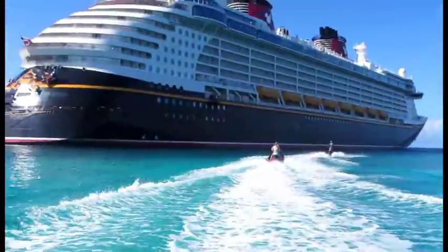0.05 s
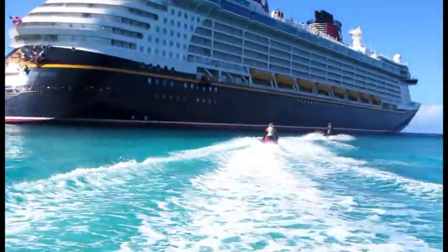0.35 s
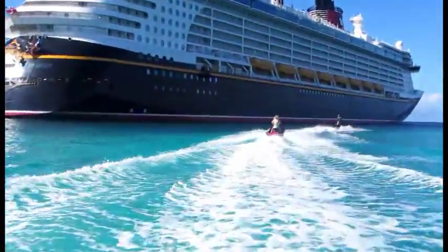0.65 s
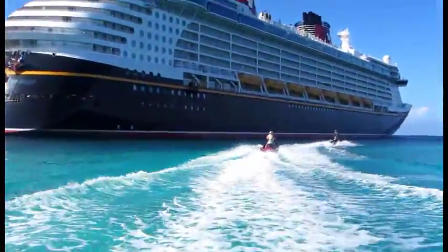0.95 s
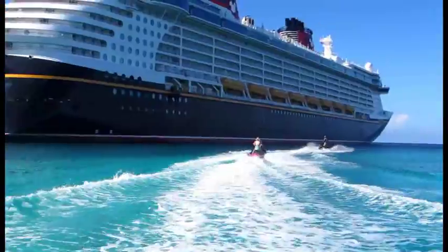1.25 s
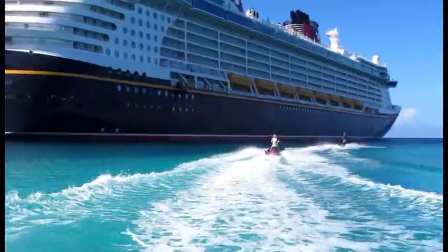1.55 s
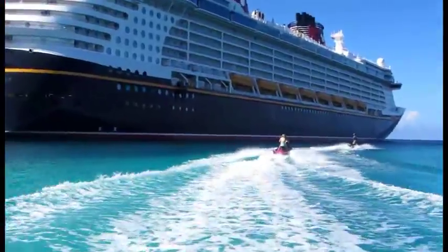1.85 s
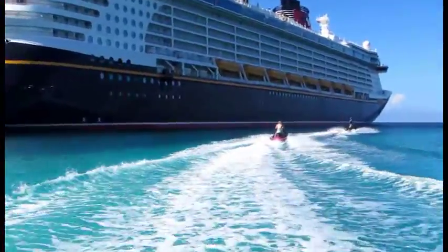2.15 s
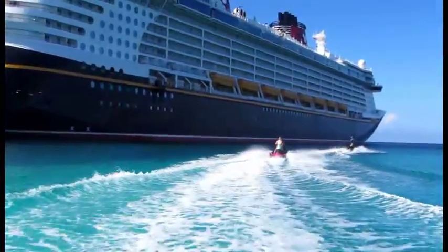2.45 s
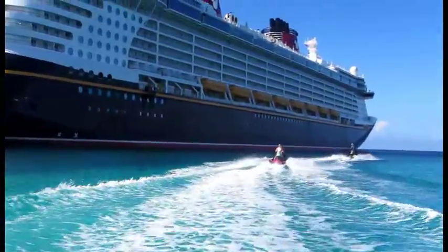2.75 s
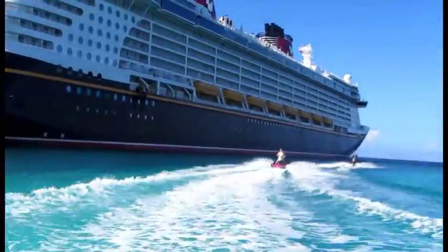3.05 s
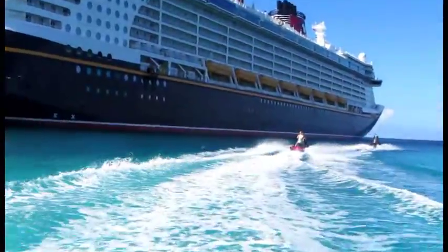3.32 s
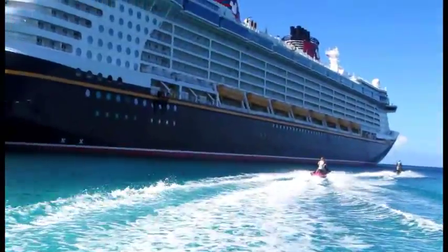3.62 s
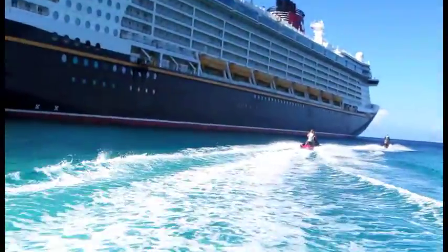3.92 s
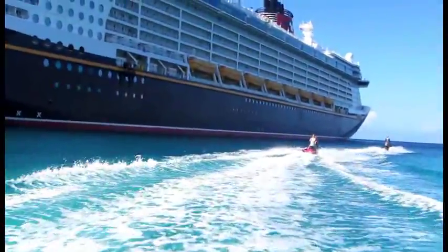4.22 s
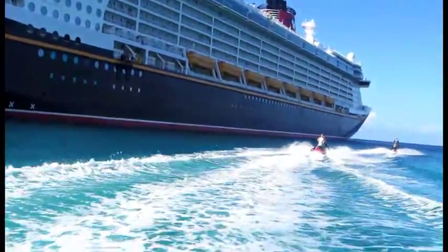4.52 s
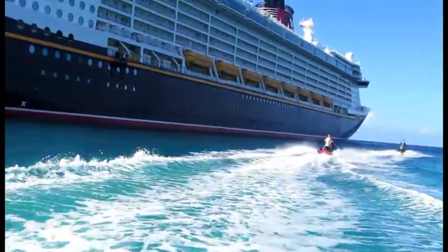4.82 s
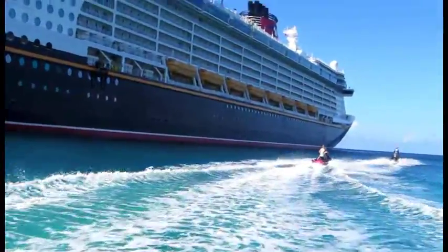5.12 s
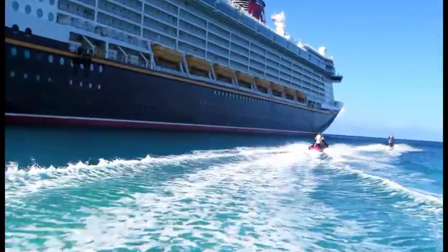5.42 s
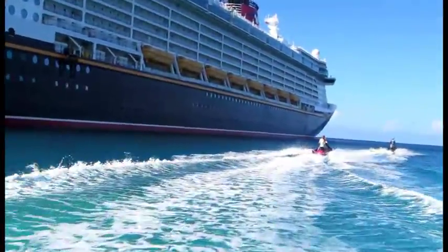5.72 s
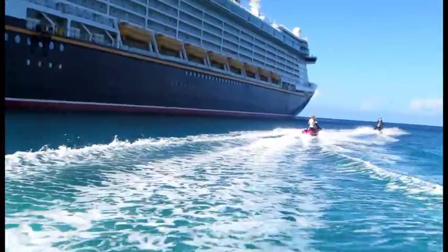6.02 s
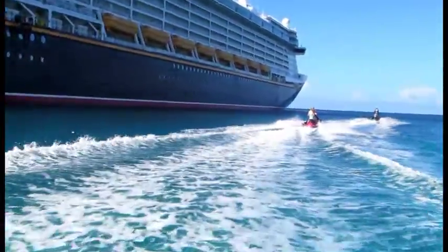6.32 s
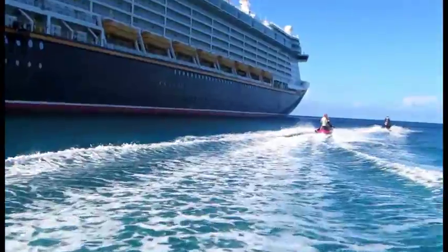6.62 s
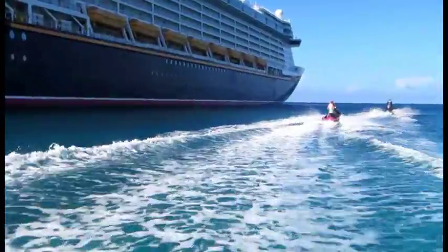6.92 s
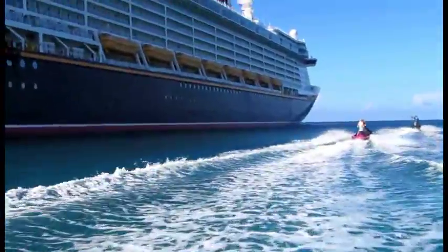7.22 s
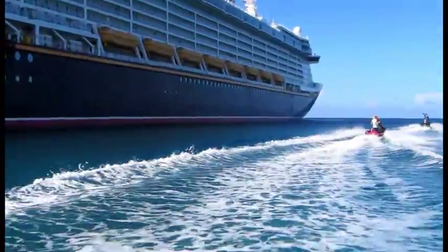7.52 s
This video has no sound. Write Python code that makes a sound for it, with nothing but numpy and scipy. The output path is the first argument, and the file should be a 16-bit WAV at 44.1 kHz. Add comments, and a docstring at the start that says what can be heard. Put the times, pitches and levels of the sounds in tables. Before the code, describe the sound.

Close, throbbing jet ski engine runs over rushing water, with repeated splashes of spray, wind rumble and one hull thump.

```python
"""A jet ski's exhaust drones over open sea, heard from the rider's seat.
Its periodic pulses form a harmonic series, and the gas burbles through the water and drums the hull.
Spray hisses up whenever the bow digs into a wave, and the exhaust throbs as the stern follows.
Turbulent wind buffets the microphone, and once the hull lands hard with a damped double thump."""
import sys
import numpy as np
from scipy import signal
from scipy.fft import rfft, irfft
from scipy.io import wavfile

SR = 44100
rng = np.random.default_rng(int(sys.argv[2]) if len(sys.argv) > 2 else 0)


def unload_audio(sound):
    """Save the sound as a 16-bit wav file, at the path given as the first command line argument."""
    columns = np.transpose(np.atleast_2d(sound))
    # keep every value between -1 and 1, then stretch to whole-number steps
    steps = np.round(np.clip(columns, -1, 1) * 32767)
    wavfile.write(sys.argv[1], SR, steps.astype(np.int16))


N = 337806
TIME = np.arange(N) / SR

# waves met by the hull: (t/s, half-width/s, bow drive/dB, throb drive/dB, throb delay/s)
SEA_WAVES = [(0.145, 0.21, 7, 6, 0.27), (0.837, .15, 4.5, 1.1, 0), (1.27, 0.24, 6, 4.5, 0.01),
             (1.843, .19, 7, 5.5, 0.068), (2.244, 0.094, 3, 5, 0.043), (2.78, 0.32, 7.5, 5.4, .26),
             (3.597, 0.17, 8, 5.5, .18), (4.304, .12, 6, 4, 0.092), (4.823, 0.24, 7.7, 3.5, 0.023),
             (5.28, 0.15, 4, 1.4, 0), (5.767, 0.2, 8, 5.8, 0.16), (6.504, 0.21, 7.5, 5, 0.22),
             (7.296, 0.23, 8, 4.5, 0.28)]
# cycle rate of the engine, the fundamental of the series: (t/s, f/Hz)
CYCLE_RATE = [(0, 38.95), (.25, 39.02), (.67, 39.37), (.95, 38.85), (1.9, 39), (2.25, 39), (2.65, 39.09),
              (3.15, 39.29), (3.6, 38.77), (3.95, 39.15), (4.3, 39.2), (4.65, 38.89), (5, 39.2),
              (6.1, 39.25), (6.35, 38.64), (6.95, 39.4), (7.35, 39.36), (7.66, 39.17)]
# the three leading harmonics: drone, firing note before the throb, bright overtone: (t/s, level/dB)
DRONE_LEVEL = [(0, -23.5), (.45, -28.5), (1.2, -24.5), (1.6, -27.5), (1.8, -23), (2.78, -26), (3.01, -21),
               (3.85, -27), (3.99, -22), (4.4, -23.5), (5.2, -22), (6.2, -23), (6.7, -28), (6.92, -20.5),
               (7.66, -21.5)]
FIRING_LEVEL = [(0, -21.5), (.53, -20), (.75, -19), (.85, -23), (1.29, -21.5), (3.59, -23.5), (3.83, -21),
                (4.26, -25.5), (4.47, -21.5), (4.78, -27), (5.04, -21), (5.22, -29), (5.34, -23.5),
                (5.71, -30), (5.81, -22.5), (6.16, -18.5), (6.54, -23), (7.66, -22.5)]
OVERTONE_LEVEL = [(0, -27), (2.58, -23.5), (3.34, -28), (3.63, -24), (3.85, -32), (5.5, -27), (5.61, -38),
                  (5.76, -25), (6.5, -28), (6.7, -39), (7.66, -27)]
DRONE_ORDER, FIRING_ORDER, OVERTONE_ORDER = 5, 6, 8
# weaker harmonics: (harmonic number, initial level/dB, final level/dB, share of the throb)
WEAK_HARMONICS = [(2, -29.5, -30, 1.3), (3, -27, -27, 0.64), (4, -36.5, -36.5, 0.038), (7, -31, -34, -3),
                  (9, -34.5, -34.8, 0.53), (10, -31.5, -31, -0.3), (11, -39.5, -35, -0.98),
                  (13, -43.5, -41, 0.11), (14, -48, -46, .2), (15, -48, -56, -0.19), (16, -52, -51.5, 0.33),
                  (18, -55, -60, .2)]
# spectra of the drumming hull and the rasping outlet: (f/Hz, relative level/dB)
BURBLE_SPECTRUM = [(60, -3.5), (110, -7), (170, -3.5), (240, -1), (295, 2.5), (370, -4.5), (460, -12.5),
                   (600, -29)]
RASP_SPECTRUM = [(300, -7), (440, 1), (520, -2.5), (640, -2.5), (720, -9.5), (800, -27), (1000, -47)]
# brief extra surges of spray and wash: (t/s, wash gain/dB, spray and mist gain/dB, half-width/s)
SPRAY_SURGES = [(.26, .3, 1.8, .04), (1.072, 1, -0.5, 0.053), (1.68, 0.5, -0.5, 0.065), (3.66, 1, 1, .04),
                (4.21, 0, 2, .035), (5.038, 2.5, 0, .05), (6.56, 1.5, 0.5, 0.05), (7.47, 1, 2, .04)]
# spectra of bubbles, drops and fine mist: (f/Hz, relative level/dB)
WASH_SPECTRUM = [(300, -31), (650, -7.5), (790, -11.5), (880, -4.5), (1000, 0), (1400, 0), (1700, -3),
                 (2100, -7), (3000, -16), (4500, -23.5), (9000, -50)]
SPRAY_SPECTRUM = [(1500, -11.5), (3200, -11), (4100, -4), (5000, -1.5), (5600, 0), (6800, -4.5),
                  (8000, -12), (11000, -18.5), (15500, -38)]
MIST_SPECTRUM = [(4000, -6), (7000, -1), (8500, -2.5), (10300, -1), (11800, -4), (15500, -5)]
# rumble of the airflow at the microphone: (t/s, level/dB)
RUMBLE_LEVEL = [(0, -34), (.95, -32), (1.8, -37), (2.8, -39), (3.15, -28), (3.8, -37), (4.8, -37.5),
                (5.35, -35), (5.8, -40), (7.66, -38)]
# buffets of wind: (t/s, level/dB, half-width/s)
WIND_BUFFETS = [(2.25, -24, 0.02), (2.418, -21, .022), (3.048, -26, .025), (3.254, -23, .035),
                (5.05, -20, .022), (6.6, -25, 0.016)]
# spectra of the rumble and the buffets: (f/Hz, relative level/dB)
RUMBLE_SPECTRUM = [(8, -22), (20, 1), (36, 1.5), (60, -1), (100, -7), (200, -25), (500, -49)]
BUFFET_SPECTRUM = [(15, -8), (35, 1), (70, -4), (130, -8), (220, -14), (330, -13), (600, -35)]
# impacts of the hull on the water: (t/s, initial envelope level/dB)
HULL_IMPACTS = [(5.033, -11), (5.084, -14)]


def undb(db):
    """Amplitude ratio of a level: 20 dB is a factor of ten."""
    return 10 ** (np.asarray(db) / 20)


def unit(x):
    """Normalisation to rms 1."""
    return x / np.sqrt(np.mean(x ** 2))


def curves(table):
    """Linear interpolation of each column to one value per sample."""
    times, *columns = np.transpose(table)
    return [np.interp(TIME, times, column) for column in columns]


def swell(t, half_width):
    """Gaussian envelope of height 1 at time t; the half-width is its standard deviation."""
    return np.exp(-.5 * ((TIME - t) / half_width) ** 2)


def colour(x, spectrum):
    """Spectral shaping, with a further 12 dB per octave of roll-off beyond both ends; rms 1."""
    hz, db = np.transpose(spectrum)
    f = np.maximum(np.arange(N // 2 + 1) * SR / N, 1)
    skirts = np.minimum(f / hz[0], 1) ** 2 * np.minimum(hz[-1] / f, 1) ** 2
    gain = undb(np.interp(np.log(f), np.log(hz), db))
    return unit(irfft(rfft(x) * skirts * gain, N))


def noise():
    """Gaussian white noise."""
    return rng.standard_normal(N)


def walk(rate):
    """Low-passed noise: a smooth fluctuation that changes about rate times a second; rms 1."""
    f = np.arange(N // 2 + 1) * SR / N
    return unit(irfft(rfft(noise()) / (1 + (2 * f / rate) ** 4), N))


def drops(per_s, spread_db):
    """Shot noise: independent impulses, many small and a few large; rms 1."""
    hits = rng.random(N) < per_s / SR
    return unit(hits * noise() * undb(spread_db * np.minimum(rng.exponential(size=N), 4)))


def wave_drive(stern_width_ratio=0.69):
    """Amplitude modulation by the waves, in dB: the bow throws spray, then the stern brings a throb."""
    bow_db = sum(db * swell(t, width) for t, width, db, _, _ in SEA_WAVES)
    throb_db = sum(db * swell(t + delay, stern_width_ratio * width)
                   for t, width, _, db, delay in SEA_WAVES)
    return bow_db, throb_db


def pipe_lag(k, cycle_hz, box_hz=285, box_width_hz=30):
    """Phase lag: higher harmonics leave the pipe later, and the exhaust box's resonance adds a turn."""
    dispersion = 2 * np.pi * k * k / 5
    resonance = 2 * np.arctan(2 * (k * cycle_hz - box_hz) / box_width_hz)
    return dispersion + resonance


def harmonic(k, cycle_hz, db, sway_rad=0.22, flutter_db=0.92):
    """Harmonic k of the engine cycle, modulated in phase and level by water lapping over the outlet."""
    phase = 2 * np.pi * k * np.cumsum(cycle_hz) / SR - pipe_lag(k, cycle_hz)
    sway = sway_rad * k / FIRING_ORDER * walk(6.0)
    return undb(db + flutter_db * walk(19.4)) * np.sqrt(2) * np.sin(phase + sway)


def exhaust(cycle_hz, throb_db, rasp_db, lead_sway_db=.5, sway_db=1.67, full_sway_hz=330):
    """Periodic gas pulses give a harmonic series; three lines lead, and the throb shifts the balance."""
    drone_db, = curves(DRONE_LEVEL)
    firing_db, = curves(FIRING_LEVEL)
    overtone_db, = curves(OVERTONE_LEVEL)
    leads = [(DRONE_ORDER, drone_db),
             (FIRING_ORDER, firing_db + 0.64 * throb_db),
             (OVERTONE_ORDER, overtone_db)]
    tone = sum(harmonic(k, cycle_hz, db + lead_sway_db * walk(9.6)) for k, db in leads)
    for k, start_db, end_db, share in WEAK_HARMONICS:
        # the higher harmonics waver most and rise with the rasp
        height = min(k * cycle_hz.mean() / full_sway_hz, 1)
        waver_db = height * (sway_db * walk(6.7) + .4 * (rasp_db - rasp_db.mean()))
        level_db = np.linspace(start_db, end_db, N) + share * throb_db + waver_db
        tone += harmonic(k, cycle_hz, level_db)
    return tone


def rasp_level(cycle_hz, bow_db, throb_db, calm_db=-39.4, db_per_hz=2.5, waver_db=1.07):
    """Flow noise at the outlet grows with engine speed and the load of a wave; its level in dB."""
    speed_db = db_per_hz * (cycle_hz - cycle_hz.mean())
    load_db = 0.52 * bow_db + 0.2 * throb_db
    return calm_db + speed_db + load_db + waver_db * walk(10.4)


def burble(cycle_hz, rasp_db, drumming_db=-25.5, pulse_depth=0.22):
    """Forced vibration: gulps of gas, swelling once a cycle, drum the hull and rasp at the outlet."""
    puff = 1 + pulse_depth * np.cos(2 * np.pi * np.cumsum(cycle_hz) / SR)
    drumming = colour(drops(4000, 1.07) * puff, BURBLE_SPECTRUM) * undb(drumming_db)
    rasp = colour(drops(6000, 0.64) * puff, RASP_SPECTRUM) * undb(rasp_db)
    return drumming + rasp


def water(bow_db, calm_wash_db=-41.7, calm_spray_db=-49.0, calm_mist_db=-57.9):
    """Bubbles, drops and mist add incoherently into bands of noise that rise as the bow digs in."""
    from_middle_s = TIME - TIME.mean()
    surge_db = 0.44 * walk(35) + sum(db * swell(t, width) for t, _, db, width in SPRAY_SURGES)
    churn_db = 0.38 * walk(25) + sum(db * swell(t, width) for t, db, _, width in SPRAY_SURGES)
    wash_db = calm_wash_db + 0.34 * bow_db - .18 * from_middle_s + churn_db
    spray_db = calm_spray_db + 1.03 * bow_db + surge_db
    mist_db = calm_mist_db + 1.09 * bow_db + 0.16 * from_middle_s + surge_db
    wash = colour(drops(16000, 0.82), WASH_SPECTRUM) * undb(wash_db)
    spray = colour(drops(32000, 0.98), SPRAY_SPECTRUM) * undb(spray_db)
    mist = colour(noise() + .35 * drops(5000, 3), MIST_SPECTRUM) * undb(mist_db)
    return wash + spray + mist


def wind(gust_db=3.0):
    """Turbulent pressure on the microphone: eddies rumble, and short buffets reach higher frequencies."""
    rumble_db, = curves(RUMBLE_LEVEL)
    rumble = colour(noise(), RUMBLE_SPECTRUM) * undb(rumble_db + gust_db * walk(11))
    buffet_envelope = sum(undb(db) * swell(t, width) for t, db, width in WIND_BUFFETS)
    return rumble + colour(noise(), BUFFET_SPECTRUM) * buffet_envelope


def hull_thumps(mode_hz=46, decay_s=0.019):
    """Damped free vibration: each impact sets the hull booming for a cycle or two."""
    boom = np.zeros(N)
    for t, db in HULL_IMPACTS:
        age = np.maximum(TIME - t, 0)
        boom += undb(db) * np.exp(-age / decay_s) * np.sin(2 * np.pi * mode_hz * age)
    return boom


def scene():
    """Superposition in a free field: engine, water, wind and hull, with nothing near to echo."""
    cycle_hz, = curves(CYCLE_RATE)
    bow_db, throb_db = wave_drive()
    rasp_db = rasp_level(cycle_hz, bow_db, throb_db)
    engine = exhaust(cycle_hz, throb_db, rasp_db) + burble(cycle_hz, rasp_db)
    return (engine + water(bow_db) + wind() + hull_thumps())[None]


def record(dry, notch_hz=1100, notch_width_hz=56, cutoff_hz=15550):
    """Frequency response of the microphone: a narrow midrange notch and a steep treble cutoff."""
    notch = signal.iirnotch(notch_hz, notch_hz / notch_width_hz, fs=SR)
    low_pass = signal.ellip(12, .1, 80, cutoff_hz, fs=SR, output="sos")
    return signal.sosfilt(low_pass, signal.lfilter(*notch, dry))


dry = scene()
out = record(dry)
unload_audio(out)
```